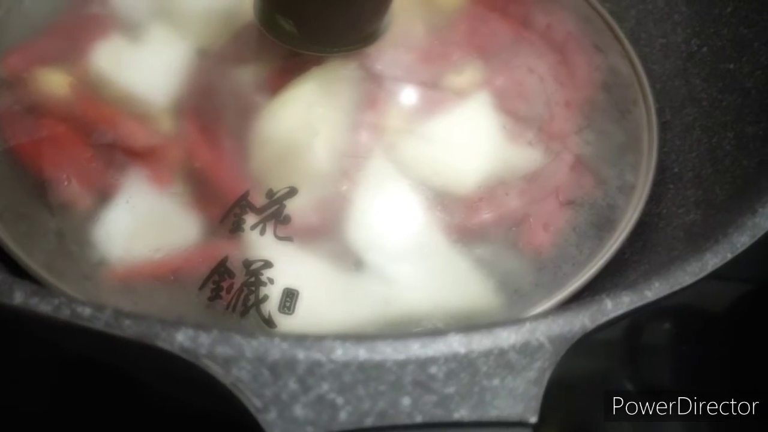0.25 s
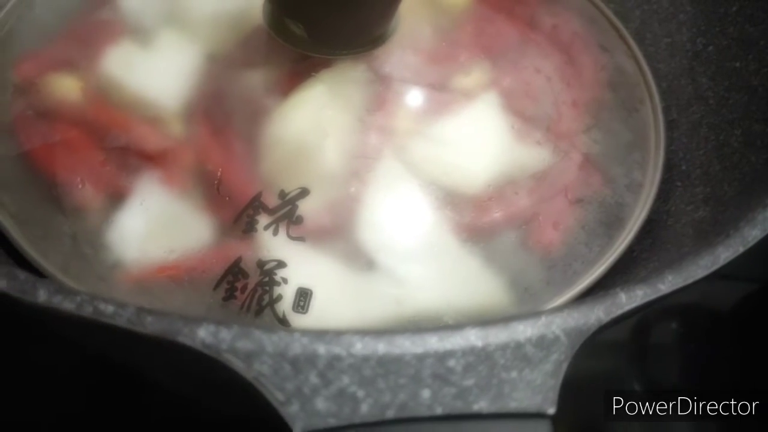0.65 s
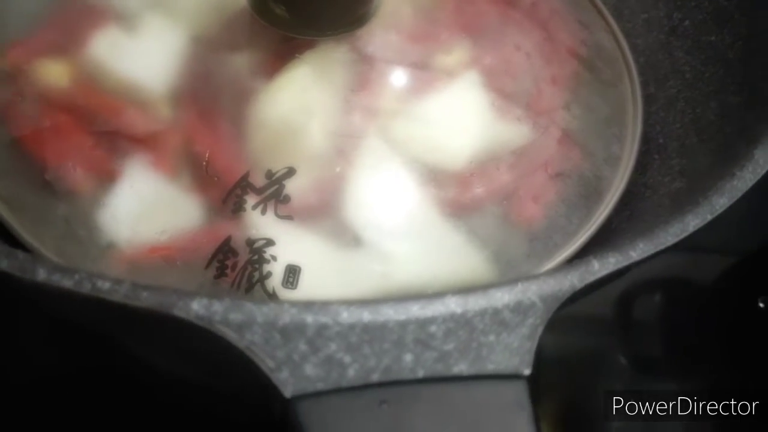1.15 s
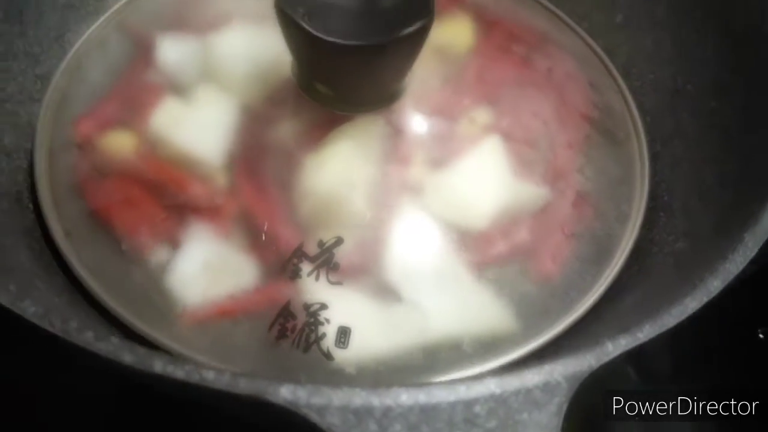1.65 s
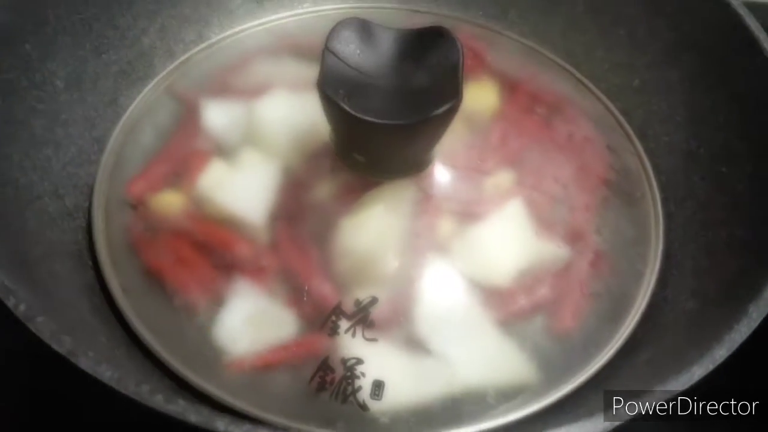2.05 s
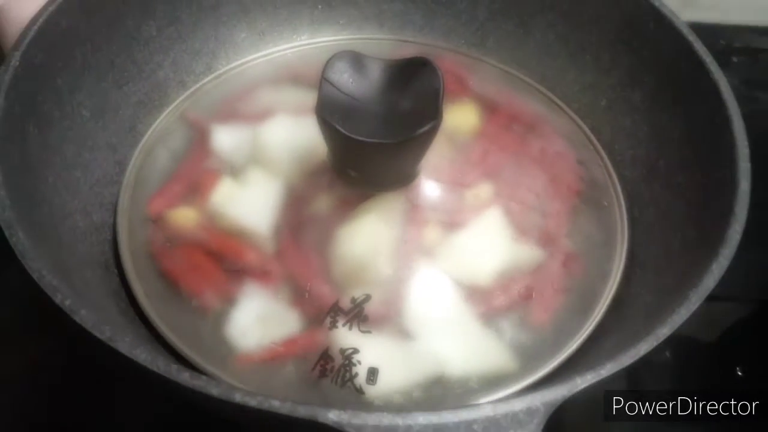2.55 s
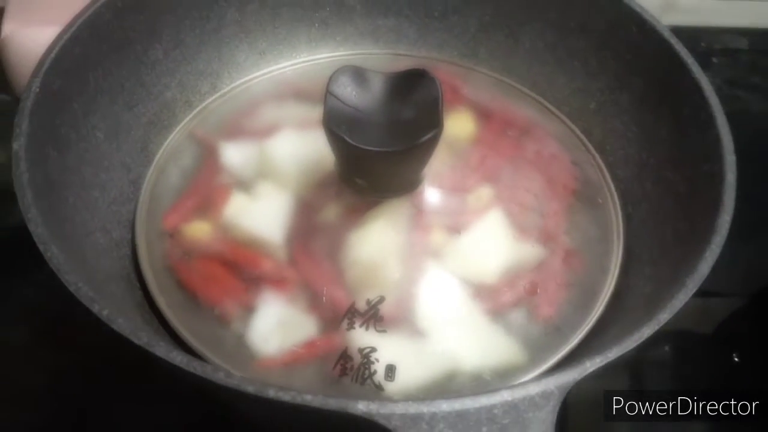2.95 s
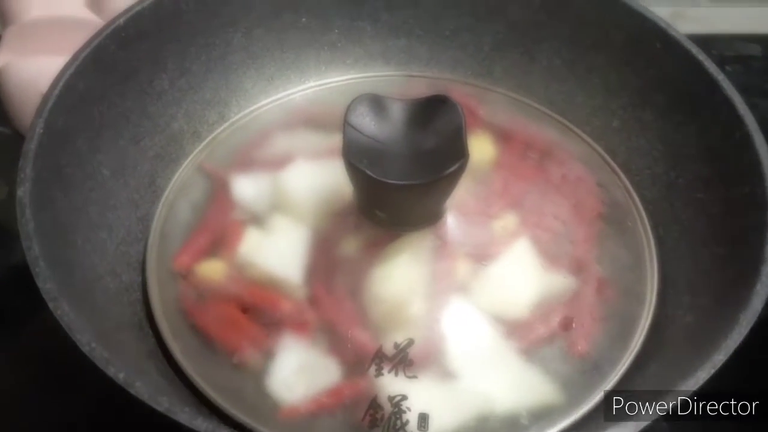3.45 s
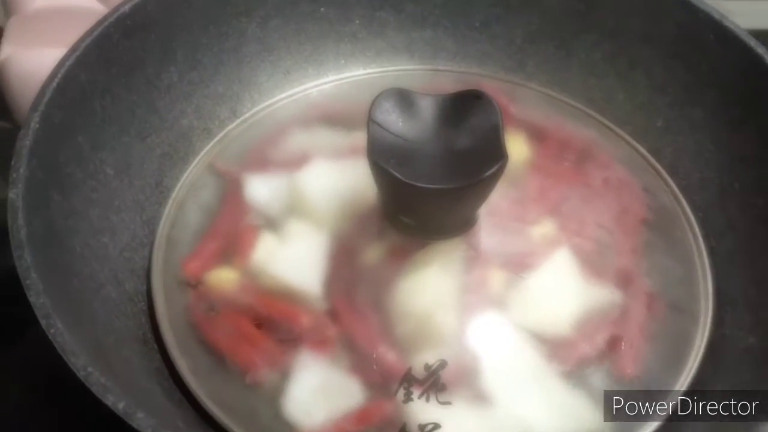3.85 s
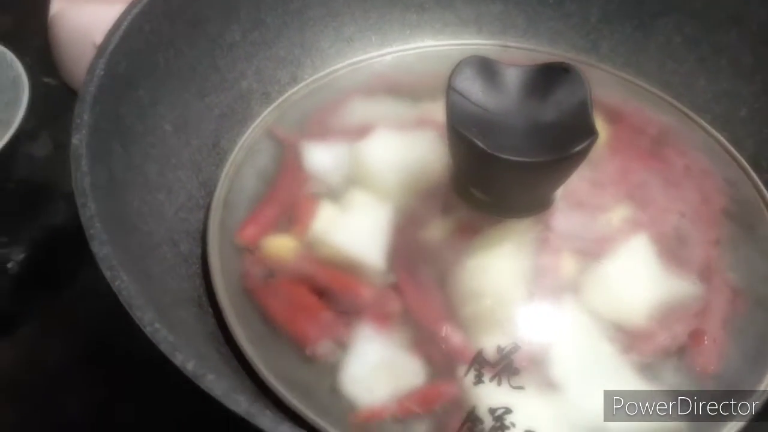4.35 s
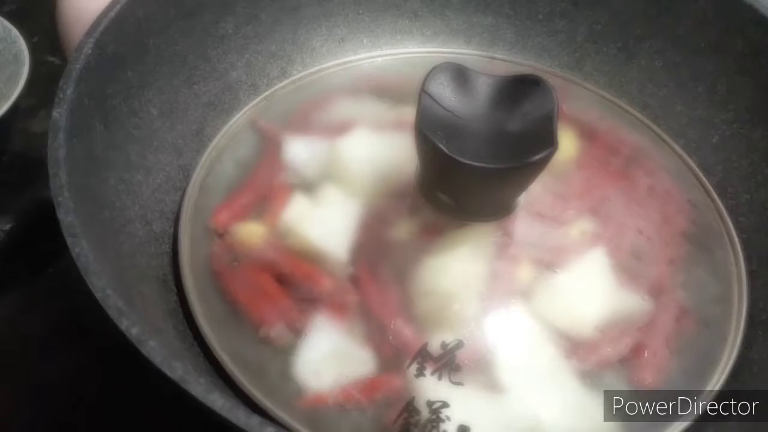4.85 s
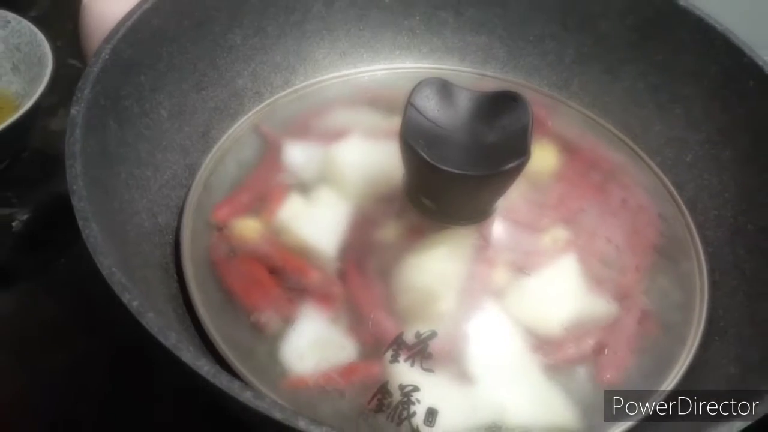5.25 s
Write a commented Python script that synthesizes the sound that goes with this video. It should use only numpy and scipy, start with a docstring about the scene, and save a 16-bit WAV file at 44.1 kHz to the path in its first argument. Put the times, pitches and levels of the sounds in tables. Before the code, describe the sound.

Irregular pops, plops and a fine sizzle come from a lidded wok of frying food, heard up close.

```python
"""In a small kitchen, chilies, onion and meat fry in a wok under a glass lid, a phone held just above it.
Bursting steam bubbles plop and excite the cavity modes under the lid; water drops flash to steam in
the hot oil and snap. Countless smaller bursts superpose into a fine crackle and hiss. A few spatters
knock on the right microphone port and set it booming, and the kitchen hums faintly."""
import sys
import numpy as np
from scipy import signal
from scipy.fft import rfft, irfft
from scipy.io import wavfile

SR = 44100
rng = np.random.default_rng(int(sys.argv[2]) if len(sys.argv) > 2 else 0)


def transcribe(signal):
    """Save signal, clipped to [-1, 1], as a 16-bit WAV file at the path in sys.argv[1]."""
    frames = np.atleast_2d(signal).T
    limited = np.clip(frames, -1, 1)
    pcm = np.round(limited * 32767).astype(np.int16)
    wavfile.write(sys.argv[1], SR, pcm)


N = 242858

# spectral envelope of the frying oil: (frequency [Hz], gain [dB])
OIL_SPECTRUM = [(100, -25.5), (250, -12), (600, -10), (2500, -1.5), (4100, -11), (5450, -7), (6400, -4.5),
                (7350, 2), (8400, -6), (11200, -14.5), (15100, -13), (16000, -30)]
SIZE = 8192  # samples in one burst
TIME, AGE = np.arange(N) / SR, np.arange(SIZE) / SR
FREQ = np.maximum(np.arange(SIZE // 2 + 1) * SR / SIZE, 1)
SIDES = np.array([[1], [-1]])  # left, right
LEAD_S = .002  # from the start of a burst to its main pulse
PLAIN_TREBLE_DB = -11.5  # top treble re middle treble for an ordinary drop


def undb(db):
    """Amplitude ratio of a level in decibels."""
    return 10 ** (np.asarray(db) / 20)


def unit(x):
    """Normalisation to rms 1."""
    return x / np.sqrt(np.mean(x ** 2))


def scattered(centre, octaves):
    """Log-normal scatter about a centre value."""
    return centre * 2 ** (octaves * rng.standard_normal())


def add(out, onset_s, sound):
    """Superposition of a short sound on the mix."""
    start = max(int(onset_s * SR), 0)
    part = out[..., start:start + sound.shape[-1]]
    part += sound[..., :part.shape[-1]]


def placed(sound, db, pan_db, window_s=.007):
    """Panning by level difference: sets the rms of a burst's opening at each port."""
    rms = np.sqrt(np.mean(sound[:, :int(window_s * SR)] ** 2, axis=1, keepdims=True))
    return sound / rms * undb(db + pan_db * SIDES / 2)


def colour(points):
    """Minimum-phase response through (frequency [Hz], gain [dB]) points."""
    hz, db = np.transpose(points)
    cepstrum = irfft(np.log(undb(np.interp(np.log(FREQ), np.log(hz), db))))
    cepstrum[1:SIZE // 2] *= 2
    cepstrum[SIZE // 2 + 1:] = 0
    return np.exp(rfft(cepstrum))


def tilt(step_db, pivot_hz, octaves):
    """Shelving response: a smooth step in level about pivot_hz."""
    return undb(step_db * np.tanh(np.log2(FREQ / pivot_hz) / octaves) / 2)


def resonance(hz, width_hz, freq=FREQ):
    """Response of a damped oscillator, gain 1 at its centre."""
    return 1 / (1 + 1j * (freq ** 2 - hz ** 2) / (freq * width_hz))


def pulse(delay_s, lag_s=0.00022):
    """Spectrum of the impulse of a tearing film, with a random arrival-time difference between ports."""
    arrival = delay_s + lag_s * rng.standard_normal() * SIDES / 2
    return np.exp(-2j * np.pi * FREQ * arrival)


def burst(rise_s, decay_s, coherent_hz):
    """Spectrum of a decaying noise puff; the ports lose coherence above coherent_hz."""
    envelope = (1 - np.exp(-AGE / rise_s)) * np.exp(-AGE / decay_s)
    mid, side = rfft(rng.standard_normal((2, SIZE)) * envelope / np.linalg.norm(envelope))
    coherence = 1 / (1 + (FREQ / coherent_hz) ** 2)
    return mid * np.sqrt((1 + coherence) / 2) + side * np.sqrt((1 - coherence) / 2) * SIDES


def hum(side_db=-10):
    """Narrow-band noise: a faint, wavering drone, nearly the same at both ports."""
    # bands of the kitchen hum: (frequency [Hz], bandwidth [Hz], level [dB])
    bands = [(123.3, 10.2, -70), (105.4, 15, -71), (46.3, 100, -71.5)]
    freq = np.maximum(np.arange(N // 2 + 1) * SR / N, 1)
    out = 0
    for hz, width, db in bands:
        noise = rfft(rng.standard_normal((2, N)))
        mid, side = irfft(noise * resonance(hz, width, freq) ** 2, N)
        out = out + undb(db) * (unit(mid) + undb(side_db) * unit(side) * SIDES)
    return out


def kitchen(tail_db=-9):
    """Direct sound plus short reverberation from the walls, different for each spot in the pan."""
    walls = colour([(150, 7.5), (400, 2.5), (6000, 5.5), (14000, 2.5)])
    return 1 + undb(tail_db) * walls * burst(rise_s=0.003, decay_s=0.026, coherent_hz=910)


def lid_reflections(loss_db=-11, detune=0.0044, round_trip_hz=544.8, fade_hz=9300):
    """Comb filtering by round trips between lid and pan; the food scatters the top treble."""
    spacing_hz = round_trip_hz * (1 + detune * rng.standard_normal())
    reflected = undb(loss_db) / (1 + (FREQ / fade_hz) ** 6)
    return 1 / (1 - reflected * np.exp(-2j * np.pi * FREQ / spacing_hz))


def cavity(place_db=1.5, port_db=1.46, detune=0.0043):
    """Modal superposition: the position of a burst decides how each mode answers at each port."""
    # low modes between lid and pan: (frequency [Hz], bandwidth [Hz], gain [dB])
    modes = [(396, 65, 2), (453.6, 33, 4), (495, 19, -4), (643, 110, -20), (969.4, 38.5, 0),
             (1028, 72.6, 1), (1152, 30, -9.5), (1558, 183, -1.5), (1892, 194, -5), (2132, 49, 0),
             (2230, 50, -6.5), (2766, 81, 2.5), (3320, 33, 8.5)]
    out = 0
    for hz, width, db in modes:
        place, port, shift = rng.standard_normal(3)
        gain = undb(db + place_db * place + port_db * port * SIDES)
        out = out + gain * resonance(hz * (1 + detune * shift), width)
    return out


def hiss():
    """Bubbles too fine to tell apart sum to Gaussian noise, coloured by oil and lid; rms 1."""
    brightness = colour([(300, -2), (2000, 5.0), (7000, 6.5), (12000, 6.5)])
    response = irfft(colour(OIL_SPECTRUM) * lid_reflections() * brightness)
    noise = rng.standard_normal((2, N + SIZE - 1))
    return unit(signal.fftconvolve(noise, response[None], mode="valid", axes=1))


def crackle(voice, per_second, spread_db, count=120):
    """Shot noise: a Poisson stream of uneven bursts from many spots in the pan; rms 1."""
    spots = [unit(voice()) for _ in range(count)]
    onsets = np.flatnonzero(rng.random(N) < per_second / SR)
    sizes = undb(spread_db * np.clip(rng.standard_normal(N), -2, 1.5))
    places = rng.integers(count, size=N)
    out = np.zeros((2, N))
    for i in onsets:
        add(out, i / SR, sizes[i] * spots[places[i]])
    return unit(out)


def fizz(ring_db=17, treble_spread_db=3.0):
    """Bubble resonance: a soft spit rings a tiny bubble in the oil at a pitch set by its size."""
    ring = undb(ring_db) * resonance(scattered(6300, octaves=0.59), width_hz=310)
    spit = burst(rise_s=0.0076, decay_s=scattered(0.0054, octaves=0.83), coherent_hz=1470)
    thin_lows = colour([(200, -10.5), (800, -9.5), (1500, -7)])
    body = colour(OIL_SPECTRUM) * (1 + ring) * lid_reflections() * thin_lows
    treble = tilt(treble_spread_db * rng.standard_normal(), pivot_hz=7500, octaves=0.25)
    return irfft(spit * body * treble * kitchen())


def small_drop(treble_spread_db=5):
    """Flash boiling of a small drop: a mild snap of random pitch and length."""
    treble_db = PLAIN_TREBLE_DB + treble_spread_db * rng.standard_normal()
    hz, length_s = scattered(5800, octaves=0.68), scattered(.002, octaves=0.586)
    return snap(treble_db, hz, length_s, crack_db=-5)


def small_bubble():
    """Rupture of a small steam bubble: a fairly clean plop whose random size sets its pitch."""
    hz = scattered(1120, octaves=0.7)
    return plop(hz, ragged_db=-9, splash_db=-6.5, blip_db=2.5, lowest_hz=315, breadth=0.61)


def port_knocks(swell_s=0.0013, release_s=0.00047, lead_db=-3, boom_hz=99,
                ring_hz=95, ring_s=0.02, ring_db=3, tail_hz=124, tail_s=0.4, tail_db=-19):
    """Impact excitation of the right port: pressure builds and flips, then a low boom swells and dies."""
    # spatters landing: (time [s], peak level [dB], boom level [dB], boom rise time [s])
    spatters = [(0.1147, -0.5, -31, 0.093), (0.486, -20, -42.5, 0.097), (0.639, -28.5, -48.5, 0.065),
                (1.899, -16, -36.5, 0.073)]
    out = np.zeros(N)
    edge = AGE[:SIZE // 8]
    ring = undb(ring_db) * np.exp(-TIME / ring_s) * np.sin(2 * np.pi * ring_hz * TIME)
    tail = undb(tail_db) * np.exp(-TIME / tail_s) * np.sin(2 * np.pi * tail_hz * TIME)
    for s, peak_db, boom_db, rise_s in spatters:
        envelope = (TIME / rise_s * np.exp(1 - TIME / rise_s)) ** 6
        boom = envelope * np.sin(2 * np.pi * boom_hz * TIME)
        add(out, s - len(edge) / SR, undb(peak_db + lead_db) * np.exp(-edge[::-1] / swell_s))
        add(out, s, -undb(peak_db) * np.exp(-edge / release_s))
        add(out, s, -undb(boom_db) * (boom + ring + tail))
    return out * np.array([[0], [1]])


def snap(treble_db, hz, length_s, crack_db):
    """Flash boiling: a crack comes through the lid, then stronger off the bowl, amid a pitched spit."""
    reflected = pulse(LEAD_S, lag_s=.00008)
    direct = undb(-9) * pulse(LEAD_S - 0.001153)
    crack = undb(crack_db) * (reflected + direct)
    spit_onset = pulse(max(LEAD_S - np.log(2) * length_s, 0), lag_s=0)
    spit = undb(-1) * spit_onset * burst(rise_s=length_s, decay_s=length_s, coherent_hz=1720)
    scatter = undb(-10) * burst(rise_s=0.0088, decay_s=0.0063, coherent_hz=800)
    ring = undb(1) * resonance(hz, width_hz=2400)
    body = colour(OIL_SPECTRUM) * (1 + ring) * lid_reflections(loss_db=-5.5, detune=0.016)
    treble = tilt(treble_db - PLAIN_TREBLE_DB, pivot_hz=8550, octaves=0.14)
    presence = colour([(2500, 0.0), (4000, -0.5), (5200, 5.0), (7000, 1)])
    return irfft((crack + spit + scatter) * body * treble * presence * kitchen(tail_db=-14.5))


def water_drops(gain_db=-0.86, ordinary_db=-31, ordinary_s=0.0014):
    """Vapour explosions, the loud snaps; the crack has a greater share in the shorter and weaker ones."""
    # drops bursting in the oil:
    # (time [s], relative level [dB], top re middle treble [dB], spit pitch [Hz], spit length [s])
    drops = [(0.0174, -23.5, -6, 6970, 0.0024), (0.0842, -34.5, -4, 6400.0, 0.0019),
             (0.142, -39, -4, 6500, 0.0043), (0.2878, -33, -6, 7060, 0.0046),
             (0.3883, -38.5, -5, 6600.0, 0.0027), (0.439, -30.5, -10, 6200, 0.0008),
             (0.4871, -25.5, -8, 6640, 0.0015), (0.4952, -26.5, -3.5, 7100.0, 0.0021),
             (0.56, -36, 2, 8200, 0.0022), (0.576, -27.5, -1, 6800, 0.0017),
             (0.641, -29.0, -1, 7400.0, 0.0007), (0.7213, -32.5, -12, 6300.0, 0.0027),
             (0.7392, -37, -2, 6800.0, 0.0018), (0.7823, -33.0, -2.5, 6600, 0.002),
             (0.8005, -37, -5, 6500.0, 0.0041), (0.9468, -28.5, -5, 5270, 0.002),
             (0.9583, -34, -7, 6700.0, 0.0057), (0.963, -33, -11, 7300.0, 0.0024),
             (1.1242, -36, -1, 7260, 0.0023), (1.2042, -34.5, -12, 5140, 0.0027),
             (1.2285, -30.5, 2, 8300.0, 0.0019), (1.2565, -26.5, -5, 6200.0, 0.0026),
             (1.3124, -36, -10, 5200.0, 0.0028), (1.3428, -31, -5, 6700.0, 0.0016),
             (1.368, -41, 2, 5800, 0.0018), (1.4053, -29.5, -7, 6750, 0.0025),
             (1.4106, -34.5, -6, 6300.0, 0.0022), (1.4343, -26, -2, 6760, 0.0019),
             (1.4973, -39.5, -10, 7900.0, 0.0033), (1.541, -30.5, -9.5, 5460, 0.0031),
             (1.6673, -19.5, -6.5, 7100, 0.0022), (1.7634, -41.0, -17, 6900.0, 0.0022),
             (1.7874, -29, -12, 7300, 0.0025), (1.8511, -36, -10, 6300.0, 0.0037),
             (1.8991, -25.0, -8.5, 6300.0, 0.0022), (1.9842, -26.5, -12, 7200, 0.0015),
             (2.0564, -29.5, 0, 7250, 0.0017), (2.1496, -33.0, -3, 6450, 0.0017),
             (2.227, -27, -5, 6800, 0.0021), (2.314, -38, 4, 6800.0, 0.0028),
             (2.356, -31.5, -2, 6600.0, 0.0021), (2.3919, -30.5, 4, 8100.0, 0.0018),
             (2.475, -33, -11, 4800, 0.0032), (2.5212, -37.5, 3, 7400.0, 0.0006),
             (2.5562, -33, -2.5, 7050, 0.0017), (2.6738, -23.5, -6, 5870, 0.0016),
             (2.7797, -33, -6, 7250, 0.0023), (2.8077, -36.5, -3, 6500.0, 0.0015),
             (2.8355, -38.5, 0, 6700.0, 0.0011), (2.8821, -27, -9, 7600, 0.0007),
             (3.0463, -37, -4, 6900.0, 0.002), (3.0956, -38.5, -5, 6850, 0.0031),
             (3.238, -32.5, -0.5, 6540, 0.0071), (3.3622, -31, -5, 7300.0, 0.0022),
             (3.4126, -39, -5, 7400.0, 0.0036), (3.462, -37, -14, 6940, 0.0022),
             (3.5425, -31.5, -17, 4640, 0.0034), (3.581, -40, -8, 7940, 0.0069),
             (3.7521, -31.0, -1.5, 7060, 0.0015), (3.7912, -34.5, -19, 6200.0, 0.002),
             (3.8705, -37, -3, 7000.0, 0.0012), (3.9662, -32, 1, 7440, 0.0014),
             (4.0144, -26.0, -0.5, 8000, 0.0007), (4.058, -36, -3, 6800.0, 0.0014),
             (4.074, -32.5, -7, 6800.0, 0.004), (4.0806, -31.5, 1, 6900.0, 0.0022),
             (4.132, -36, -15, 5800.0, 0.0008), (4.2215, -36, -5, 6700.0, 0.0027),
             (4.3491, -35, -2, 7900, 0.0022), (4.4223, -35.5, -7, 6600.0, 0.0044),
             (4.5654, -35.5, -4, 5060, 0.0025), (4.6356, -37, -11, 8100, 0.0021),
             (4.7654, -37, -3, 7600.0, 0.0047), (4.8192, -33, 2.5, 7060, 0.0015),
             (5.0643, -38.5, -11, 4130, 0.0024), (5.1425, -28, -4, 6840, 0.001),
             (5.367, -36, -4, 6700.0, 0.0018)]
    out = np.zeros((2, N))
    for s, db, treble_db, hz, length_s in drops:
        crack_db = -4 - 0.52 * (db - ordinary_db) + 4 * np.log2(ordinary_s / length_s)
        sound = snap(treble_db, hz, length_s, crack_db)
        pan_db = -1 + 0.8 * rng.standard_normal()
        add(out, s - LEAD_S, placed(sound, db + gain_db, pan_db))
    return out


def plop(hz, ragged_db, splash_db, blip_db, lowest_hz, breadth=1.0, blip_width_hz=300):
    """Impulse excitation: a steam bubble swells, tears with a blip, rings the cavity and splashes back."""
    # bubble sound leaking past the lid: (frequency [Hz], gain [dB])
    leak = [(60, 5), (150, -2), (300, -74), (700, -33), (1300, -20.5), (1900, -28.5), (2600, -34.5),
            (6000, -58), (16000, -76)]
    tear = pulse(LEAD_S)
    swell = undb(-10) * pulse(LEAD_S - 0.001316)
    blip = undb(blip_db) * pulse(LEAD_S) * np.exp(-((FREQ - hz) / blip_width_hz) ** 2 / 2)
    ragged = undb(ragged_db) * burst(rise_s=0.00088, decay_s=0.003, coherent_hz=1900)
    splash = undb(splash_db) * burst(rise_s=0.0072, decay_s=0.0081, coherent_hz=1210)
    # the size of the bubble limits the bass, the soft food the treble
    bass_cut = (resonance(lowest_hz, lowest_hz) * FREQ / lowest_hz) ** 2
    bass_cut *= FREQ / (lowest_hz + 1j * FREQ)
    soft_food = colour([(1200, 11), (2250, 8.0), (2600, -1.0), (4000, -3.0), (8000, -12)])
    body = (cavity() + colour(leak)) * resonance(hz, breadth * hz)
    return irfft((tear + swell + blip + ragged + splash) * body * soft_food * bass_cut * kitchen())


def big_bubbles(ordinary_db=-31, advance_s=.0004):
    """Film rupture, the loud plops: a bigger bubble tears more cleanly and reaches deeper."""
    # steam bubbles bursting under the lid: (time [s], level [dB], pitch [Hz], left minus right [dB])
    bubbles = [(0.0055, -29.5, 1270.0, 0), (0.017, -35.5, 2200, -1), (0.0604, -31, 640, -2),
               (0.0708, -33, 1530, 3), (0.257, -37, 980, 2), (0.349, -45, 1320.0, 10),
               (0.4097, -28.5, 1440, 0), (0.4226, -30.5, 740, 2), (0.4367, -39.0, 1295, -5),
               (0.4866, -26.5, 1240, 2.5), (0.5125, -29.5, 1290.0, 6), (0.5473, -34.5, 1090.0, 2),
               (0.5643, -33, 890.0, 2.0), (0.5776, -33, 1280, 2), (0.7436, -33, 850, 2),
               (0.8048, -33.5, 2180.0, 2.5), (0.8926, -34.0, 1470, 3), (0.9385, -30.5, 680, 0.5),
               (0.948, -21.5, 1610, 1), (1.09, -39, 1860, 1), (1.1278, -42, 1720, 1.5),
               (1.1744, -40, 1980.0, 2), (1.1881, -35.5, 1140, 9), (1.2045, -19.5, 1440.0, 2),
               (1.2547, -40, 1820.0, 4), (1.352, -36.5, 700.0, -1.0), (1.3687, -39, 1670, 0),
               (1.406, -48, 2240.0, 4), (1.4346, -38, 2360, 0), (1.471, -33, 1200, 1),
               (1.5414, -31, 1970, 0.0), (1.5588, -27.5, 835, 0), (1.5834, -29, 1180, 0),
               (1.6267, -29.5, 980, -1), (1.6656, -25.5, 1600, 4), (1.951, -40, 1120, 0),
               (1.9838, -25, 910, 1), (2.0968, -35.5, 795, -1), (2.1124, -36.0, 760.0, 2),
               (2.127, -35.5, 1850.0, 2.0), (2.1498, -39, 1810, 3.5), (2.175, -39, 1170.0, 1),
               (2.193, -48, 1200.0, 1.5), (2.2463, -34, 1070, -2), (2.2758, -30.0, 1110, 3.0),
               (2.3922, -32.5, 895, 3), (2.4434, -23, 1020, 5), (2.547, -31, 1020, 1),
               (2.5656, -37.5, 1140.0, 6.5), (2.5948, -33.5, 1450.0, 4.5), (2.6739, -35, 2400, 11),
               (2.7527, -36, 2050.0, -1), (2.8825, -27.0, 820, 1), (2.922, -38, 850, 5),
               (3.016, -48, 1170, 1.5), (3.1829, -38, 790, 6), (3.239, -33.5, 1610, 4),
               (3.4331, -32, 860, 3), (3.5405, -25, 1900, 1.0), (3.6241, -32.5, 810, 4),
               (3.777, -38, 840, 2), (3.8185, -35, 1010, -2), (3.8358, -30.5, 940, 2),
               (3.9142, -36.5, 1290, -3), (3.9256, -34, 1140.0, -3), (3.9392, -33, 1350, 4),
               (3.9663, -39, 1800, 6), (4.0141, -26.5, 850, 1.5), (4.0817, -40, 1380.0, 12),
               (4.2326, -30, 810, 3), (4.2905, -36.5, 700, 4), (4.3304, -35.5, 860.0, -2),
               (4.3506, -34, 970.0, 0), (4.3685, -42, 1180.0, 5), (4.423, -36, 1970, 4),
               (4.4552, -32.5, 1600, -1), (4.5045, -37.5, 440.0, 4), (4.595, -36.5, 950.0, 5),
               (4.634, -33.5, 720, 6), (4.6444, -36.5, 1710, 2.5), (4.7562, -37.5, 850, 2),
               (4.869, -41, 1000, 7), (5.132, -26.0, 2100, 1.5), (5.2, -37.5, 1470.0, 6),
               (5.2615, -36, 1170.0, 1.5), (5.3386, -39, 1660, 1.0), (5.3672, -35.0, 1060, -2),
               (5.4304, -29, 930, 0.5)]
    out = np.zeros((2, N))
    for s, db, hz, pan_db in bubbles:
        bigger_db = db - ordinary_db
        lowest_hz = 300 * 2 ** (-0.14 * bigger_db)
        sound = plop(hz, ragged_db=-7 - 2 * bigger_db, splash_db=-10, blip_db=3, lowest_hz=lowest_hz)
        add(out, s - LEAD_S - advance_s, placed(sound, db, pan_db))
    return out


def scene():
    """Superposition: loud bursts over the hum and over bubbling and sizzle that rise and fall."""
    # level of the bubbling and sizzle, which sinks briefly after the first knock:
    # (time [s], bubbling gain [dB], sizzle gain [dB])
    frying_levels = [(0, -64, -45), (.1, -40.5, -46), (.14, -57.5, -58.5), (.34, -42, -53), (.53, -48, -45),
                     (.82, -49, -52), (1.1, -42.5, -47.5), (1.43, -41.5, -46.5), (1.72, -47, -48.5),
                     (2.3, -44, -46.5), (2.85, -44, -49), (3.1, -44, -50.5), (3.35, -47.5, -49),
                     (3.6, -44.5, -49.5), (4.19, -44, -46.5), (4.59, -47, -50.5), (4.9, -48.5, -48.5),
                     (5.51, -43, -48)]
    times, bubbling_db, sizzle_db = np.transpose(frying_levels)
    bubbling = undb(0.2) * crackle(small_bubble, per_second=190, spread_db=3.5)
    sizzle = undb(1.85) * crackle(fizz, per_second=300, spread_db=10.0)
    sizzle += undb(-3) * hiss()
    sizzle += undb(-3.5) * crackle(small_drop, per_second=33, spread_db=-1.5, count=60)
    bubbling *= undb(np.interp(TIME, times, bubbling_db))
    sizzle *= undb(np.interp(TIME, times, sizzle_db))
    return big_bubbles() + water_drops() + bubbling + sizzle + port_knocks() + hum()


def record(dry, ceiling=0.34, top_hz=15550):
    """Transduction in the phone: unequal port responses, soft saturation and a low-pass filter."""
    # port imbalance, the left being duller: (frequency [Hz], left minus right [dB])
    imbalance = [(100, 2), (450, 1), (1000, -0.5), (2400, 0.5), (4400, 0), (8100, -2.5), (11500, -9.5),
                 (15000, -8.5)]
    hz, balance_db = np.transpose(imbalance)
    gains = undb(SIDES * balance_db / 2)
    gains_db = 20 * np.log10(gains / np.sqrt(np.mean(gains ** 2, axis=0)))  # constant total power
    ports = np.array([irfft(colour(np.column_stack([hz, db]))) for db in gains_db])
    heard = signal.fftconvolve(dry, ports, axes=1)[:, :N]
    lowpass = signal.ellip(8, .2, 70, top_hz, fs=SR, output="sos")
    return signal.sosfilt(lowpass, ceiling * np.tanh(heard / ceiling))


dry = scene()
out = record(dry)
transcribe(out)
```